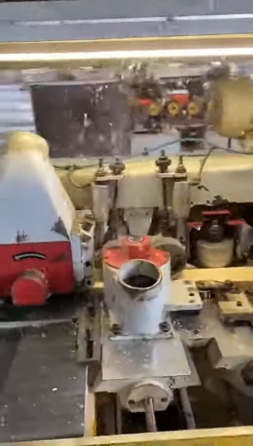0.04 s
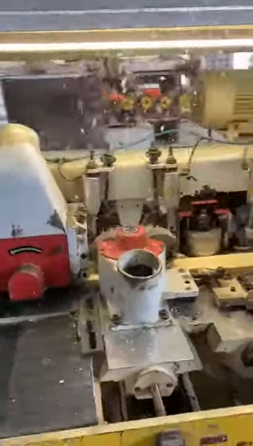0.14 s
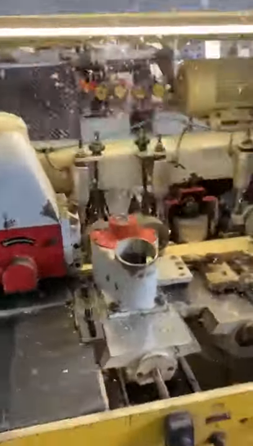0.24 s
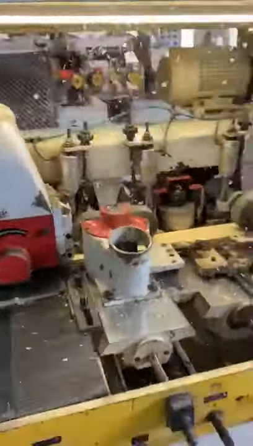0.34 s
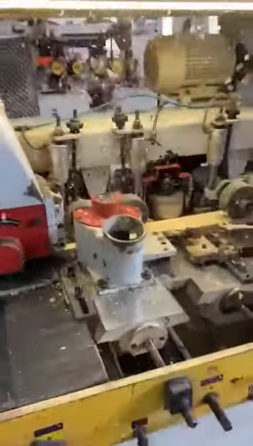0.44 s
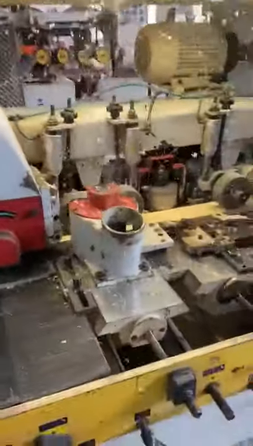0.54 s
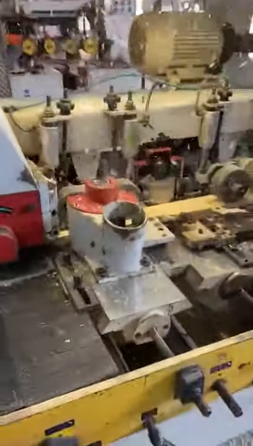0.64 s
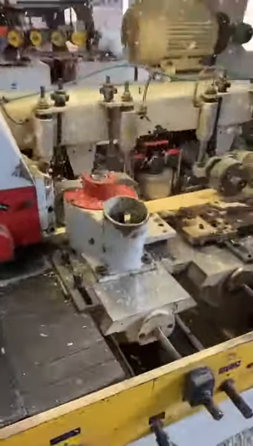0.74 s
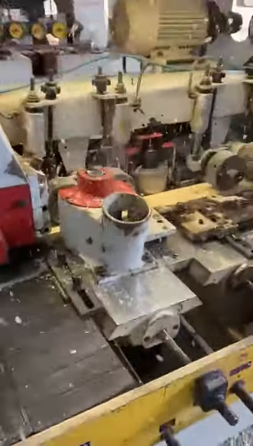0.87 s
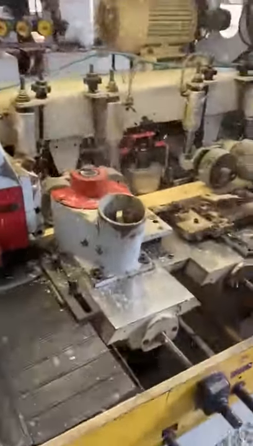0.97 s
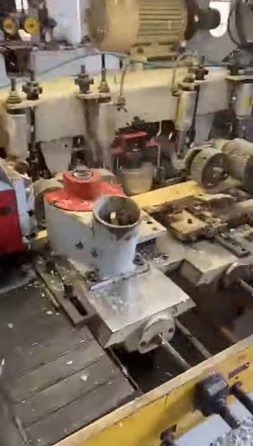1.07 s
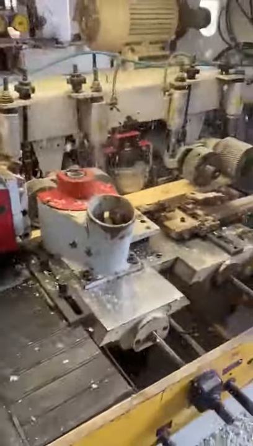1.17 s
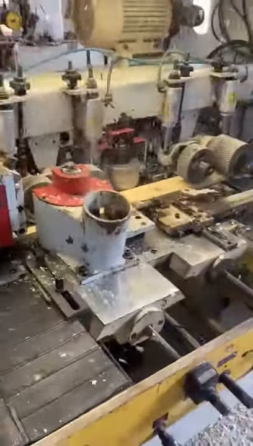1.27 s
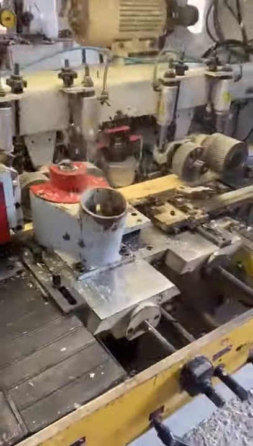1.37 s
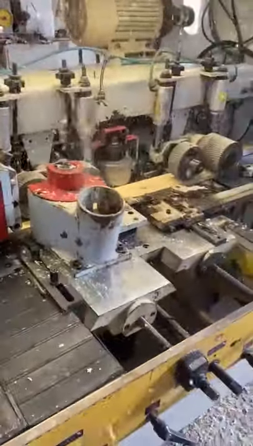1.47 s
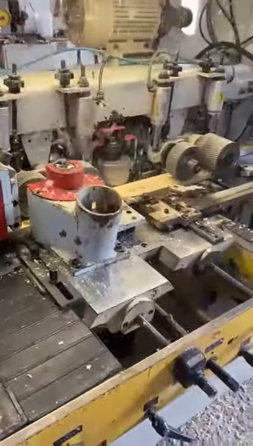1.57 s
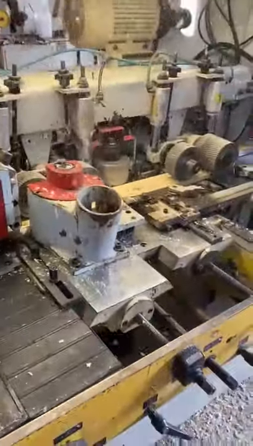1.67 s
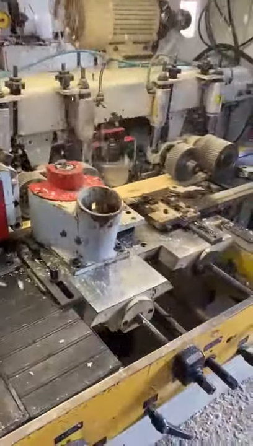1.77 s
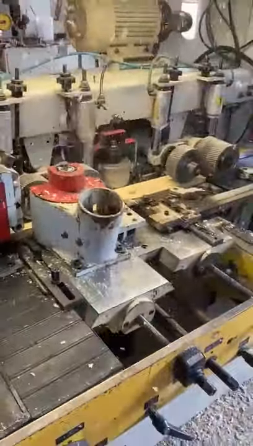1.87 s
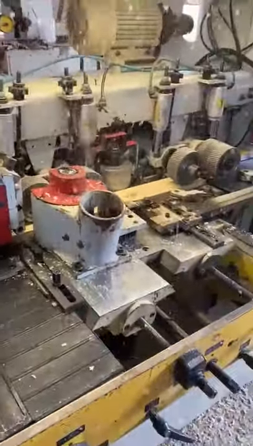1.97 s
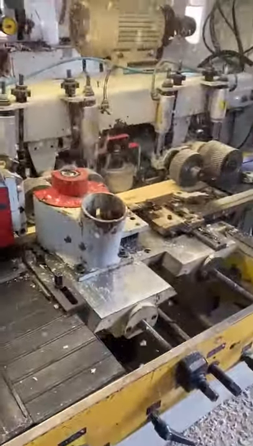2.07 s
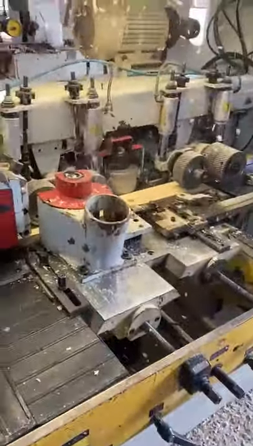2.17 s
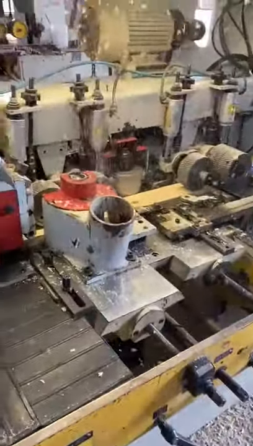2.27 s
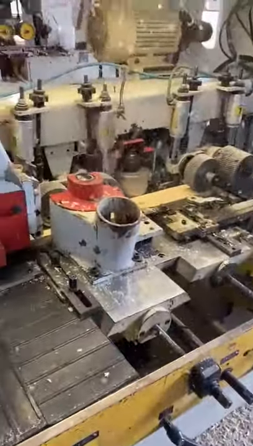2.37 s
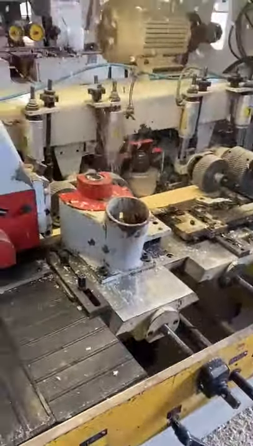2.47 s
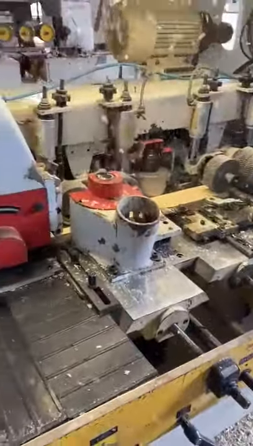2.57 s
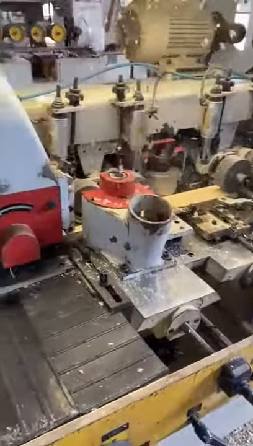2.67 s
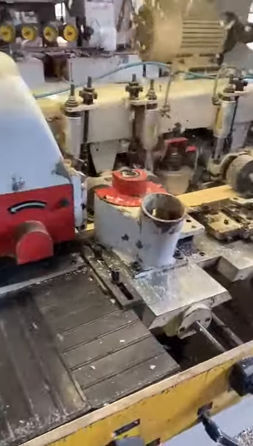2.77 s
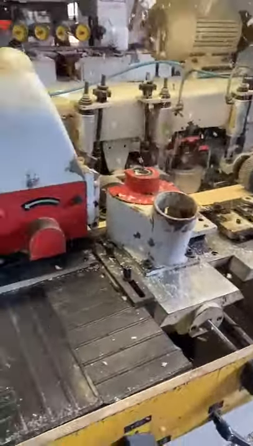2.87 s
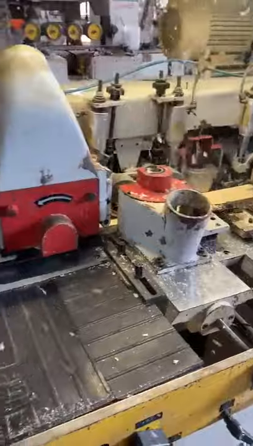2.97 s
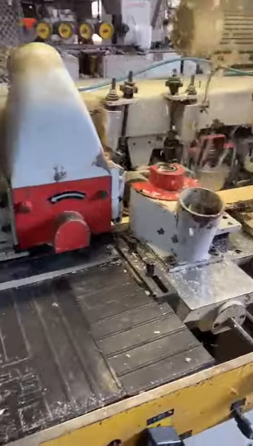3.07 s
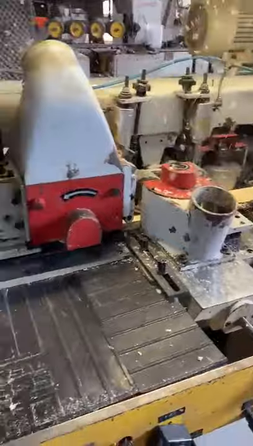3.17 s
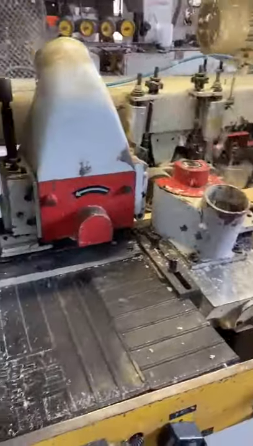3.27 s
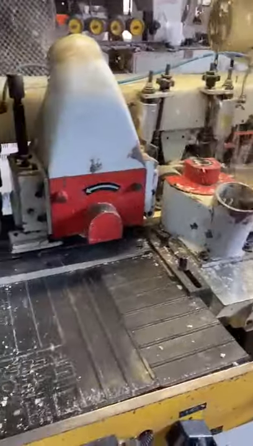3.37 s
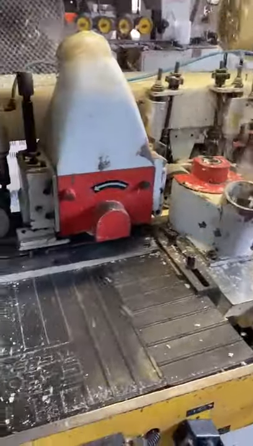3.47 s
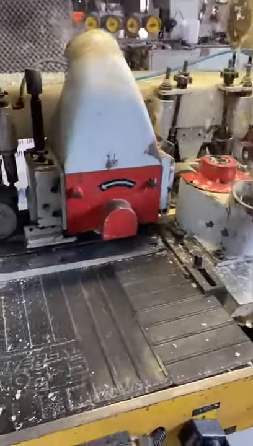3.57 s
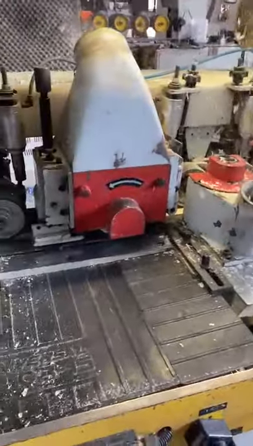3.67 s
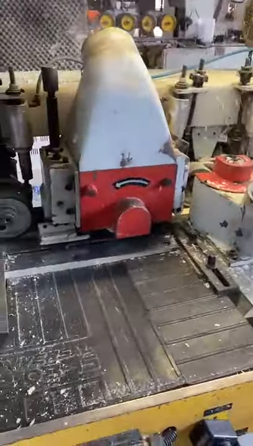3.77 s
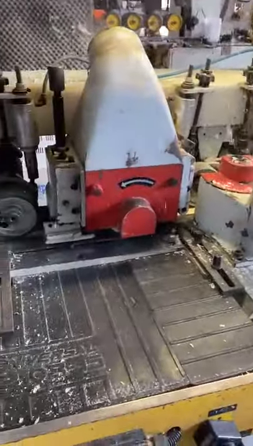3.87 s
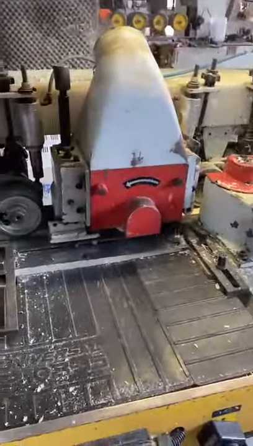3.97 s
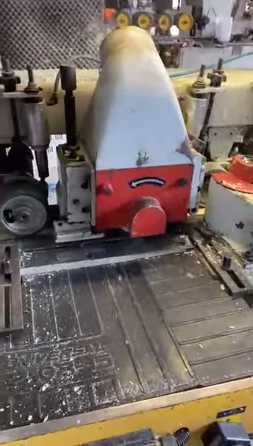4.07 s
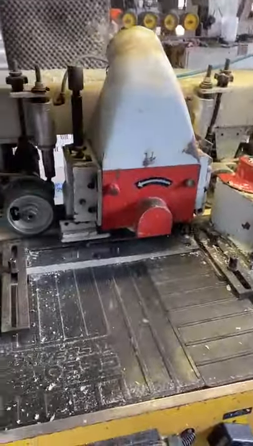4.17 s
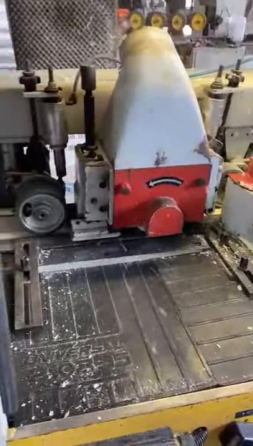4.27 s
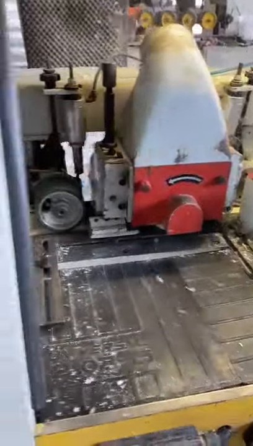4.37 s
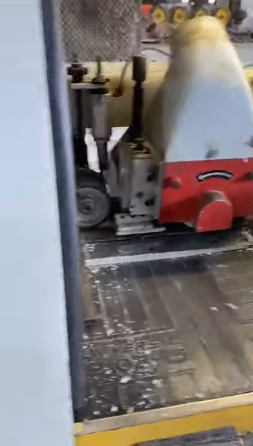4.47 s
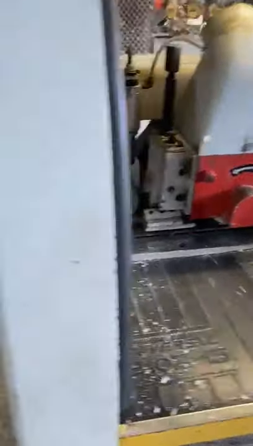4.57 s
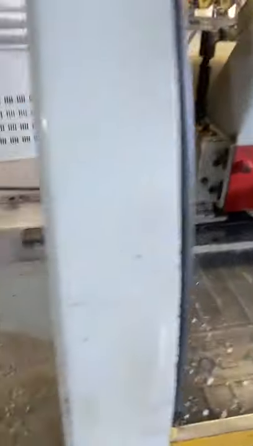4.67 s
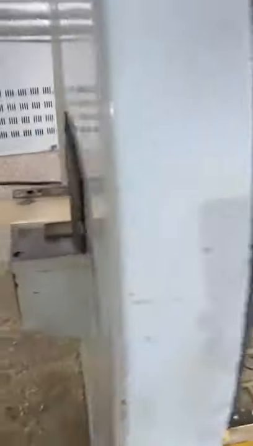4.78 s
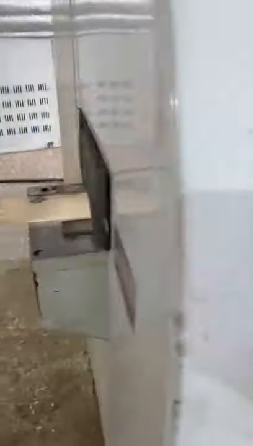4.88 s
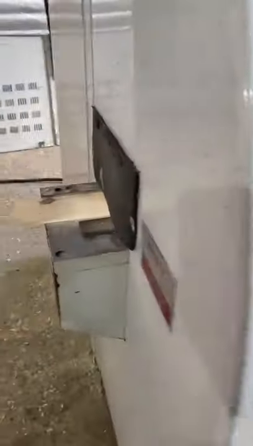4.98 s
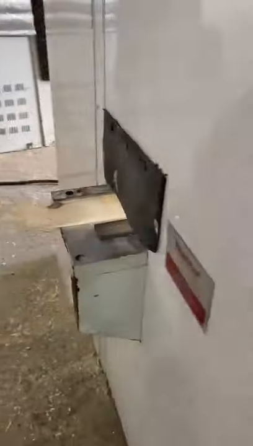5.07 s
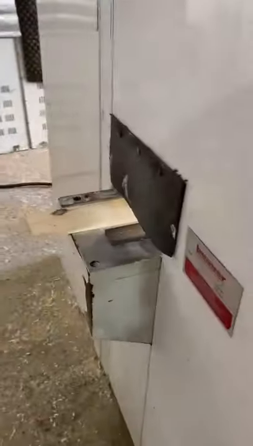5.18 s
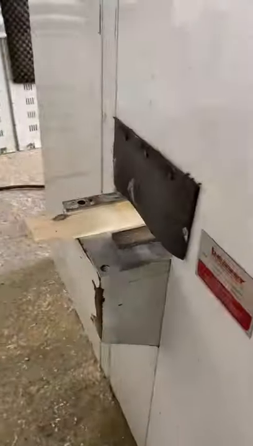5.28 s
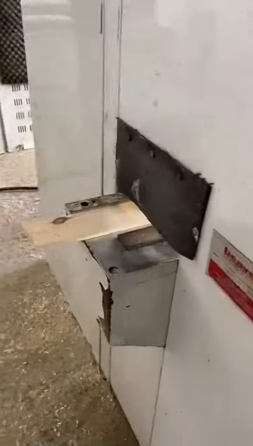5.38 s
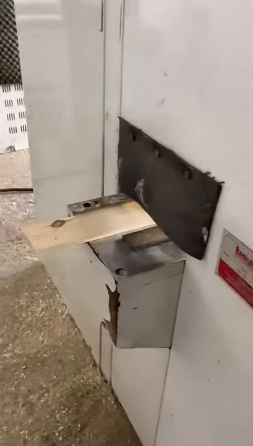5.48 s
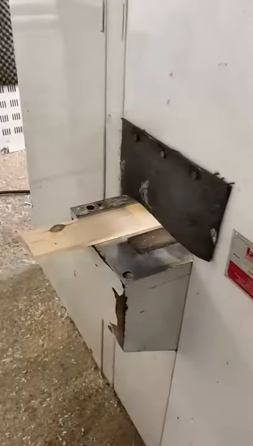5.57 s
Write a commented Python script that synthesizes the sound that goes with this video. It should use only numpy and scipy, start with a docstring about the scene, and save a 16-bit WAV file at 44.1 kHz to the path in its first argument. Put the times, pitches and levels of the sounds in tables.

```python
"""A four-sided planer-moulder cuts a board; the microphone moves along it. Throughout, motors drone, noise rushes,
four spindles hum and beat, and chips hiss and patter. At first a rough pair of heads beats in the wood: overtone
sums, one blow a turn. At 1 s a harder, buzzing head bites; the rough pair leaves from 1.35 s. The infeed guard's
shading deepens from 3.3 s; the hum dips at 4 s. Two chips tick on steel at 4.6 and 4.8 s, as the cut grows
duller, dullest at 5.25 s."""
import sys
import numpy as np
from scipy import signal
from scipy.fft import rfft, irfft, next_fast_len
from scipy.io import wavfile
from scipy.ndimage import uniform_filter1d

SR = 44100
rng = np.random.default_rng(int(sys.argv[2]) if len(sys.argv) > 2 else 0)


def put_to_file(sound):
    """Save the sound as 16-bit audio at rate SR, in the file named by the first command-line argument."""
    columns = np.atleast_2d(sound).T  # one column per channel
    safe = np.clip(columns, -1, 1)
    whole_steps = np.round(safe * 32767)
    wavfile.write(sys.argv[1], SR, whole_steps.astype(np.int16))


N = 248283
TIME = np.arange(N) / SR
BLOCK = 64  # samples per step of the overtone synthesis

# Background
# rush of air and machinery: f/Hz, density/(dB per Hz)
RUSH = [(15, -103.5), (33, -90.5), (55, -64.5), (75, -77.5), (110, -76.5), (160, -68), (260, -71.5),
        (400, -69), (600, -73), (1000, -74.5), (2000, -85.5), (5000, -90), (12000, -103)]
# motors, belts, feed gears: f/Hz, mean level/dB
MOTORS = [(50, -60), (58.3, -71), (88.5, -59), (108.05, -54.5), (116.5, -52), (145.6, -48), (174.5, -59.5),
          (190.3, -59.5), (312.4, -56), (350, -71.5), (372.2, -58.5)]
# difference against sum: f/Hz, level/dB (tones take a share of it)
WIDTH = [(60, -32), (110, -25), (200, -16), (450, -13), (850, -4.5), (1500, -18), (2100, -12), (2800, -3),
         (4000, -5), (5500, 1.5), (8000, 12)]
# lean to the left: f/Hz, share
LEAN = [(80, -0.033), (200, 0.14), (450, 0.27), (900, 0.063), (2000, .07), (4500, -0.15), (8000, 0)]
SUM_EDGE_HZ, DIFFERENCE_EDGE_HZ = 7250, 11950

# Hum
# four nearly equal spindles: speed/(turns per s), t in step with the first/s
SPINDLES = [(104.259, 0), (104.082, 4.43), (104.381, 4.14), (103.766, 1.28)]
# hum per spindle, on top of HUM_LEVEL: twice a turn/dB, four times a turn (knives)/dB
SPINDLE_TONES = [(-51.5, -42.5), (-56.5, -43.5), (-72, -35.5), (-58.5, -49)]
# grows towards the open heads, dips briefly, fades past them: t/s, relative level/dB
HUM_LEVEL = [(0.05, -16), (.22, 1.5), (1, 3), (2.3, -1), (3.85, 2), (4.02, -13), (4.2, -3.5), (4.7, 0.5),
             (5.1, -4.5), (5.63, -2.5)]
# out-of-balance last spindle, before trim: t/s, level/dB
DRONE = [(0.03, -46), (1.32, -38), (2.12, -43.5), (3.71, -41), (4.34, -46), (5.4, -33.5), (5.6, -35)]
# eight times the spindle speed, before trim: t/s, level/dB
EIGHTH = [(0.0, -31), (0.09, -30), (0.2, -30), (0.39, -41), (0.44, -32), (0.8, -42), (0.85, -35.5),
          (1.3, -34.5), (1.57, -45), (1.65, -36.5), (1.98, -35), (2.13, -43.5), (2.84, -36.5), (2.88, -42),
          (5.0, -39.5), (5.44, -56.5), (5.6, -44), (5.63, -46)]

# Chips
# torn fibres and flying chips, before modulation: f/Hz, density/(dB per Hz)
CHIPS = [(100, -101), (350, -68.5), (700, -73), (1150, -72.5), (1650, -67.5), (2400, -71.5), (3500, -73.5),
         (5000, -81), (6300, -80.5), (8000, -95.5), (10000, -96), (12000, -111)]
# large chips on steel, before high-pass: t/s, level/dB
CHIP_HITS = [(4.557, -36.5), (4.845, -37)]
CHIP_FLUTTER_DB = .7
# comb depth of the hiss, peaking at multiples of the turn rate; full above this frequency
HISS_COMB, HISS_COMB_HZ = .85, 2400
THROB = .85  # how far chips gather into puffs, share

# Cutter motion and position
# spindle speeds: t/s, speed/(turns per s)
ROUGH_SPEED = [(0, 104.2), (.35, 104.25), (.7, 104.36), (1.5, 104.3)]
HARD_SPEED = [(1, 104.22), (2, 104.25), (4.4, 104.27), (5, 104.2), (5.63, 104.12)]
# microphone behind the infeed guard: t/s, share 0-1
BEHIND_GUARD = [(0, 0.34), (3.3, 0.03), (3.9, 0.22), (4.35, 0.3), (4.6, 0.55), (4.9, 0.87), (5.25, 1),
                (5.45, 0.37), (5.63, 0.57)]
# direct knife sound fills echo dips between overtones: t/s, share 0-1
DIRECT = [(0, .45), (.85, .45), (1, 0.13), (1.55, 0.62), (2, .1), (2.9, .1), (3.3, .1), (4, .1), (5, 0.23),
          (5.5, 0)]
HARD_ENTERS_S, ENTRY_S = .99, .025
ROUGH_LEAVES_S, EXIT_DB_PER_S = 1.35, 95
ROUGH_AGAINST_HARD_DB = -9
ROUGH_LATE_TURNS = .2

# Cutter radiation, relative; levelled per register
# head and hood: multiple of spindle speed, level/dB
ROUGH_ORDERS = [(5, -15), (6, -11), (7, -8), (9, -9), (10, -12), (11, 2.5), (12, 8), (13, 7.5), (14, -7),
                (15, -2.5), (16, -3.5), (17, -3.5), (18, -9), (19, -1), (20, -4.5), (21, -11.5), (22, -2),
                (23, -2.5), (24, -7.5)]
HARD_ORDERS = [(5, -18.5), (6, -14), (7, -10.5), (9, -16), (10, -10), (11, -9), (12, 1.5), (13, 3),
               (14, -12), (15, -2.5), (16, 3), (17, -5.5), (18, -15), (19, -10), (20, -0.5), (21, -4.5),
               (22, -7.5), (23, -8.5), (24, -13), (25, -8), (26, -15), (27, -10), (28, -10.5), (29, -17.5),
               (30, -20.5), (31, -10), (32, -15.5)]
# hard head behind the guard: multiple of spindle speed, level/dB
GUARD_ORDERS = [(5, -19), (6, -19.5), (7, -6.5), (9, -23.5), (10, -15.5), (11, -15.5), (12, -16), (13, -4),
                (14, -5.5), (15, -4), (16, 0.5), (17, -12.5), (18, -16.5), (19, -9), (20, -17.5),
                (21, -20.5), (22, -10.5), (23, -13), (24, -22), (25, -12), (26, -19), (27, -26),
                (28, -14.5), (30, -24), (31, -30.5), (32, -10.5)]
# higher up: f/Hz, level/dB
ROUGH_TREBLE = [(2700, -12), (3200, -9.5), (3650, -10), (4200, -15), (5000, -14.5), (6500, -16),
                (8000, -38), (9000, -25.5), (10500, -41.5), (12000, -34.5)]
HARD_TREBLE = [(3450, -20), (3650, -11.5), (4000, -21), (4600, -18.5), (5100, -16.5), (5700, -10.5),
               (6200, -16), (6600, -27), (8000, -53.5), (10000, -42), (12000, -49.5)]
GUARD_TREBLE = [(3450, -9.5), (3560, -19), (3750, -28.5), (4300, -20.5), (5100, -29.5), (5900, -27.5),
                (8000, -63.5), (12000, -61)]

# Cutter levels, before per-head trim
# rasp, body, growl, bite, sizzle: f low/Hz, f high/Hz
REGISTERS = [(1400, 2400), (1100, 1400), (570, 1100), (2400, 4500), (4500, 7000)]
# rasp, leading the cut's loudness: t/s, level/dB
LOUDNESS = [(0.03, -21), (.2, -22.5), (0.42, -21), (.62, -22.5), (.85, -21.5), (0.97, -25), (1.02, -19),
            (1.12, -21.5), (1.35, -19.5), (1.55, -19.7), (1.85, -24.5), (2.2, -24), (2.95, -23.5),
            (3.14, -21), (3.36, -24), (3.5, -22), (3.65, -27), (3.82, -28), (4.02, -23.5), (4.59, -24),
            (4.98, -28.5), (5.17, -32.5), (5.33, -32), (5.6, -34.5)]
USUAL_DB = -22.7  # loudness at which followers keep their usual level
# body: t/s, level/dB
BODY = [(0.0, -35), (0.14, -36), (0.27, -27), (0.63, -28), (1.1, -38.5), (1.25, -27), (1.4, -28),
        (1.63, -27), (1.91, -32), (2.13, -29), (2.9, -31), (3.12, -27.5), (3.42, -29.5), (3.7, -39.5),
        (4.22, -31), (4.55, -41.5), (4.61, -37), (4.7, -44.5), (5.05, -42.5), (5.63, -35.5)]
# bite: t/s, level/dB
BITE = [(0, -26.5), (.4, -26), (.8, -29), (.95, -30), (1.03, -25.5), (1.35, -25.5), (1.55, -28.5),
        (1.85, -30.5), (2.3, -26), (2.9, -27.5), (3.15, -28.5), (3.35, -30.5), (3.52, -27.5), (3.75, -32.5),
        (4.05, -28.5), (4.4, -30.5), (4.6, -36), (4.77, -33), (4.87, -38.5), (4.98, -36), (5.3, -39.5),
        (5.55, -37)]
# growl, sizzle: slope/(dB per dB of loudness), shade behind guard/dB, flicker/dB
REGISTER_RULE = [(0.83, -4, 1.13), (0.52, -13, 1.5)]
FLICKER_PER_S = 4
# lean of the rasp to its top: t/s, tilt/(dB per octave)
RASP_TILT = [(0, -3), (.4, 2), (.9, -4.5), (1.04, 5), (1.25, -3), (1.7, -0.5), (2.2, -7), (2.9, -8.5),
             (3.15, -1), (3.55, 5), (4, 2), (4.5, 0.5), (5, -10), (5.25, 0), (5.45, -1), (5.6, 14)]

# Moving resonances
# hoods, two whines: t/s, centre f/Hz, lift/dB
LOW_WHINE = [(.1, 1334, 14), (.3, 1290, 17), (.55, 1310, 1), (.8, 1180, 1.5), (1.2, 1224, 12),
             (1.8, 1140, -5.5), (2.3, 1330, -1), (3.2, 1286, 8), (3.7, 1280, 21), (4.2, 1340, 10),
             (4.6, 1340, -9.5), (5.5, 1130, 19)]
HIGH_WHINE = [(.05, 2100, 7.5), (.25, 2030, 5), (.42, 1940, 8.5), (.7, 1700, 2.5), (1.05, 1540, 1),
              (1.5, 1720, -1), (2.2, 1570, -5.5), (3, 1670, 1), (3.5, 1650, 2), (4.1, 1660, 4.5),
              (4.6, 1700, 2), (5, 1540, -3.5), (5.35, 1390, 11)]
# side hood, shrill: t/s, centre f/Hz, lift/dB
SHRILL = [(.05, 3540, -6), (.3, 3750, 4), (.8, 3600, -6), (1.35, 3400, 4.5), (2.4, 3810, 0), (3.3, 3650, 0),
          (3.52, 3700, 4.5), (4.1, 3840, -4.5), (4.45, 3550, -11.5), (4.58, 3450, 8), (4.77, 3500, 6),
          (5.1, 3490, -2)]
# machine bed, hollow: t/s, centre f/Hz, lift/dB
HOLLOW = [(.1, 1010, -0.5), (.55, 1054, 9), (.85, 1080, 4.5), (.95, 970, 4.5), (1.3, 945, 8.5),
          (1.6, 960, -10.5), (2.2, 1030, 1.5), (2.7, 1050, -2.5), (3.15, 1050, 8.5), (3.5, 1030, 9),
          (3.9, 1050, -2), (4.4, 1050, -3), (5.1, 1000, 7.5), (5.55, 1050, 4.5)]
WHINE_WIDTH_HZ, SHRILL_WIDTH_HZ = 70, 550

# Stroke and echoes
ROUGH_SWEEP_S, HARD_SWEEP_S = .00045, .00012  # spread of the registers within a stroke
ROUGH_SHAKE_RAD, HARD_SHAKE_RAD = .085, .075  # phase jitter from wood grain, at the rasp's pitch
ROUGH_SCATTER_RAD, HARD_SCATTER_RAD = .12, .21  # echo phase spread up to the rasp's pitch, in the open
ROUGH_DRIFT_PER_S, HARD_DRIFT_PER_S = 1.6, .8  # echo drift rate at the rasp's pitch
FASTEST_FADE = 1.3  # drift rate stops rising above this multiple of the rasp's pitch
GUARD_SCATTER = 1.6  # extra scatter behind the guard, where only reflections arrive
RING = .78  # share of the minimum-phase ring
BOUNCE_S, BOUNCE, BOUNCE_HZ = .0031, .45, 3300  # steel frame echo: delay, gain, lowest frequency
TWIN_SLIP_TURNS_PER_S, TWIN_IN_STEP_S, TWIN = -.3, -1.2, .48  # second rough head: slip, t in step, strength


def amp(db):
    """Decibels to gain."""
    return 10 ** (np.asarray(db) / 20)


def curve(rows, t=TIME, axis=1):
    """One column of a time table, linearly interpolated."""
    rows = np.array(rows)
    return np.interp(t, rows[:, 0], rows[:, axis])


def read(points, hz):
    """A spectrum table, interpolated over log frequency."""
    f, value = np.transpose(points)
    return np.interp(np.log(hz + 1), np.log(f + 1), value)


def wander(t, per_s):
    """Unit-spread smooth chance: twelve random sines with rates around per_s."""
    speed, start = rng.standard_normal((12, 1)), rng.random((12, 1))
    angle = 2 * np.pi * (per_s * speed * t + start)
    return np.sin(angle.astype(np.float32)).sum(0) / np.sqrt(len(speed) / 2)


def slow(per_s):
    """Smooth chance at every sample, interpolated from a coarse grid."""
    t = np.linspace(0, TIME[-1], N // 128)
    return np.interp(TIME, t, wander(t, per_s))


def turns_of(speed):
    """Turns made by a spindle: integral of its speed."""
    return np.cumsum(curve(speed)) / SR


def in_wood(t=TIME):
    """Engagement of the rough and the hard head, as gains."""
    rough = amp(-np.clip(EXIT_DB_PER_S * (t - ROUGH_LEAVES_S), 0, 40))
    hard = np.clip((t - HARD_ENTERS_S) / ENTRY_S, .005, 1)
    return rough, hard


def colour(pair, spectrum, comb_depth=0):
    """Filter two white noises to a wide sum and difference; a one-turn delay combs them at the turn rate."""
    size = next_fast_len(N)
    hz = np.fft.rfftfreq(size, 1 / SR)
    depth = comb_depth * np.minimum(hz / HISS_COMB_HZ, 1)
    one_turn_late = np.exp(-2j * np.pi * hz / curve(HARD_SPEED).mean())
    comb = (1 + depth * one_turn_late) / np.hypot(1, depth)
    a, b = rfft(pair, size) * amp(read(spectrum, hz)) * comb * np.sqrt(SR / 2)
    side = read(LEAN, hz) * a + amp(read(WIDTH, hz)) * b
    return irfft([a, side], size)[:, :N]


def tone(hz, level_db, waver_rad, spread, lead_turns=0):
    """Phase-wavering machine tone, as sum and difference; level is RMS."""
    phase = 2 * np.pi * (hz * TIME + lead_turns) + waver_rad * slow(1.2)
    z = np.sqrt(2) * amp(level_db) * np.exp(1j * phase)
    side = read(LEAN, hz) * z.real - spread * amp(read(WIDTH, hz)) * z.imag
    return np.array([z.real, side])


def rush():
    """Steady broadband noise of air and machinery."""
    return colour(rng.standard_normal((2, N)), RUSH)


def motors():
    """Motors, belts and gears: fixed-pitch tones, each wandering in level and phase."""
    return sum(tone(hz, db + 2.0 * slow(1.8), waver_rad=1.0, spread=.7) for hz, db in MOTORS)


def spindle_hum():
    """Tones locked to four nearly equal speeds swell and cancel as the spindles drift in and out of step."""
    first_speed = SPINDLES[0][0]
    out = tone(SPINDLES[-1][0], curve(DRONE) - 0.5, waver_rad=.15, spread=.5)
    for (speed, in_step_s), levels_db in zip(SPINDLES, SPINDLE_TONES):
        lead = (first_speed - speed) * in_step_s
        for order, db in zip((2, 4), levels_db):
            out += tone(order * speed, db + curve(HUM_LEVEL), waver_rad=.029, spread=.8,
                        lead_turns=order * lead)
    return out + tone(8 * first_speed, curve(EIGHTH) - 2.0, waver_rad=.2, spread=.8)


def chips(follow=0.55, guard_db=-7.0, patter_per_s=300, patter_db=-10, tearing_db=2.0):
    """Noise pulsing once a turn (puffs) plus random decaying strikes on the hoods; level follows the cut."""
    rough, hard = in_wood()
    puff_turns = turns_of(HARD_SPEED) - .1 - ROUGH_LATE_TURNS * (1 - hard)
    puffs = 1 + THROB * np.cos(2 * np.pi * puff_turns)
    strikes = (rng.random(N) < patter_per_s / SR) * rng.exponential(1, N)
    decay = np.exp(-TIME[:400] / .0008)
    patter = signal.oaconvolve(strikes, decay)[:N]
    size = puffs + amp(patter_db) * patter / patter.std()
    level_db = follow * (curve(LOUDNESS) - USUAL_DB) + guard_db * curve(BEHIND_GUARD)
    level_db = level_db + tearing_db * rough + CHIP_FLUTTER_DB * slow(7.3)
    return colour(size * rng.standard_normal((2, N)), CHIPS, HISS_COMB) * amp(level_db)


def chip_hits(decay_s=0.019, low_hz=3500):
    """Single chips on steel: decaying bursts of high-passed noise."""
    size = sum(amp(db) * (TIME >= s) * np.exp(-abs(TIME - s) / decay_s) for s, db in CHIP_HITS)
    high_pass = signal.butter(2, low_hz, "high", fs=SR, output="sos")
    return signal.sosfilt(high_pass, size * rng.standard_normal((2, N)))


def overtones(orders, treble, count=114):
    """Relative level in dB of every multiple of the spindle speed."""
    base_hz = HARD_SPEED[0][1]
    points = [(k * base_hz, db) for k, db in orders] + treble
    return read(points, base_hz * np.arange(1, count + 1))


def head_shares(t):
    """Gains of the rough and the hard head; squares sum to one."""
    rough, hard = in_wood(t)
    rough = rough * amp(ROUGH_AGAINST_HARD_DB)
    return np.array([rough, hard]) / np.hypot(rough, hard)


def register_levels(t):
    """Rasp, body, growl, bite, sizzle in dB; growl and sizzle follow loudness, flicker, and the guard shades them."""
    rasp_db = curve(LOUDNESS, t)
    behind = np.clip(curve(BEHIND_GUARD, t), 0, 1)
    growl_db, sizzle_db = (
        USUAL_DB + follow * (rasp_db - USUAL_DB) + shade_db * behind + flicker_db * wander(t, FLICKER_PER_S)
        for follow, shade_db, flicker_db in REGISTER_RULE)
    return [rasp_db, curve(BODY, t), growl_db, curve(BITE, t), sizzle_db]


def resonance_db(rows, width_hz, t, hz):
    """Gaussian lift of each overtone by one moving resonance."""
    offset = (hz - curve(rows, t)[:, None]) / width_hz
    return curve(rows, t, axis=2)[:, None] * np.exp(-.5 * offset ** 2)


def whine_db(t, hz):
    """Moving hood resonances plus the tilt of the rasp."""
    lo, hi = REGISTERS[0]
    octaves = np.log2(hz / np.sqrt(lo * hi)) * ((hz > lo) & (hz < hi))
    lift_db = curve(RASP_TILT, t)[:, None] * octaves
    for rows, width_hz in ((LOW_WHINE, WHINE_WIDTH_HZ), (HIGH_WHINE, WHINE_WIDTH_HZ), (SHRILL, SHRILL_WIDTH_HZ)):
        lift_db = lift_db + resonance_db(rows, width_hz, t, hz)
    return lift_db


def levelled(shape_db, t, hz, trim_db):
    """Echoes only trade strength between overtones: scale each register's power to the level of the cut."""
    lifts_db = []
    for db, trim, (lo, hi) in zip(register_levels(t), trim_db, REGISTERS):
        power = np.sum(amp(shape_db[:, (hz > lo) & (hz < hi)]) ** 2, 1)
        lifts_db.append(db + trim - 10 * np.log10(power))
    rising = np.argsort(np.array(REGISTERS)[:, 0])
    # short crossfades at the register edges
    edges = (np.array(REGISTERS)[rising] * [1.04, .96]).ravel()
    weights = np.array([np.interp(hz, edges, np.repeat(row, 2)) for row in np.eye(len(rising))])
    return shape_db + np.array(lifts_db)[rising].T @ weights


def ring_phase(level_db, order):
    """A blow rings after it lands: minimum phase (Hilbert transform of log gain), scaled by RING."""
    mirrored_db = np.c_[level_db[:, :1], level_db, level_db[:, -2::-1]]
    return -RING * signal.hilbert(np.log(amp(mirrored_db))).imag[:, order]


def twin_beats(t, order, strength):
    """A slipping second head beats against the first, faster in each higher overtone."""
    slip_turns = TWIN_SLIP_TURNS_PER_S * (t[:, None] - TWIN_IN_STEP_S)
    return (1 + strength * np.exp(2j * np.pi * slip_turns * order)) / np.hypot(1, strength)


def frame_bounce(hz, gain):
    """The treble of the stroke returns late from the steel frame."""
    back = gain * (hz > BOUNCE_HZ)
    return (1 + back * np.exp(-2j * np.pi * hz * BOUNCE_S)) / np.hypot(1, back)


def cutter(speed, share, open_db, guarded_db, scatter_rad, drift_per_s, fade_db, shake_rad, trim_db, sweep_s,
           late_turns=0, twin=0, rebound=0):
    """The proudest knife strikes once a turn: a sum of overtones, shifted by echoes as the microphone moves."""
    t, order = TIME[::BLOCK], np.arange(1, len(open_db) + 1)
    hz = curve(speed).mean() * order
    height = hz / np.sqrt(np.prod(REGISTERS[0]))  # multiple of the rasp's pitch

    # short waves scatter sooner; the strong middle register stays one sharp stroke
    blur, pace = np.clip(height, 1, 2), np.minimum(height, FASTEST_FADE)
    fade = np.array([wander(t, r) for r in drift_per_s * pace]).T
    bend = np.array([wander(t, r) for r in drift_per_s * pace / 2]).T
    swing = np.array([wander(t, r) for r in drift_per_s * np.sqrt(pace)]).T

    behind = np.clip(curve(BEHIND_GUARD, t), 0, 1)[:, None]
    direct = np.clip(curve(DIRECT, t), 0, 1)[:, None]
    shape_db = (1 - behind) * open_db + behind * guarded_db
    smooth_db = 20 * np.log10(uniform_filter1d(amp(shape_db), size=3, axis=1))
    shape_db = (1 - direct) * shape_db + direct * smooth_db
    shape_db = shape_db + whine_db(t, hz) + fade_db * np.sqrt(blur) * fade
    level_db = levelled(shape_db, t, hz, trim_db) + resonance_db(HOLLOW, WHINE_WIDTH_HZ, t, hz)

    # the knife sweeps through the wood: registers sound at slightly different moments
    sweep = 2 * np.pi * hz[0] * np.cumsum(sweep_s * wander(order / len(order), 9))
    # uneven grain frays the high overtones most
    grain = shake_rad * height ** 1.5 * np.array([wander(t, 24) for _ in order]).T
    echoes = scatter_rad * blur ** 2 * (1 + GUARD_SCATTER * behind) * bend
    rotation = 2 * np.pi * (turns_of(speed)[::BLOCK, None] - late_turns) * order
    phase = rotation + ring_phase(level_db, order) - sweep + echoes + grain

    beats = twin_beats(t, order, twin * np.minimum(height, 1) ** 3)  # the twin sounds thinner
    mid = share[:, None] * amp(level_db) * beats * frame_bounce(hz, rebound) * np.exp(1j * phase)
    mid = mid * ((order > 4) & (order != 8))  # these multiples belong to the hum
    side = mid * (read(LEAN, hz) + 1j * amp(read(WIDTH, hz)) * np.exp(.9j * swing))
    waves = np.exp(2j * np.pi * hz[:, None] * TIME[:BLOCK])
    return np.sqrt(2) * (np.array([mid, side]) @ waves).real.reshape(2, -1)[:, :N]


def cut():
    """Rough beating pair, then hard buzzing head; trims in dB for rasp, body, growl, bite, sizzle."""
    rough_db = overtones(ROUGH_ORDERS, ROUGH_TREBLE)
    hard_db = overtones(HARD_ORDERS, HARD_TREBLE)
    guarded_db = overtones(GUARD_ORDERS, GUARD_TREBLE)
    rough_share, hard_share = head_shares(TIME[::BLOCK])
    rough = cutter(ROUGH_SPEED, rough_share, rough_db, rough_db, scatter_rad=ROUGH_SCATTER_RAD,
                   drift_per_s=ROUGH_DRIFT_PER_S, fade_db=3.45, shake_rad=ROUGH_SHAKE_RAD,
                   trim_db=[-3.5, 3.5, -13.5, -2.5, -13.0], sweep_s=ROUGH_SWEEP_S,
                   late_turns=ROUGH_LATE_TURNS, twin=TWIN)
    hard = cutter(HARD_SPEED, hard_share, hard_db, guarded_db, scatter_rad=HARD_SCATTER_RAD,
                  drift_per_s=HARD_DRIFT_PER_S, fade_db=2.5, shake_rad=HARD_SHAKE_RAD,
                  trim_db=[-2.0, 1, -15.5, -3.5, -15.5], sweep_s=HARD_SWEEP_S, rebound=BOUNCE)
    return rough + hard


def scene():
    """All sources, from sum and difference to left and right."""
    mid, side = rush() + motors() + spindle_hum() + chips() + chip_hits() + cut()
    return np.array([mid + side, mid - side])


def low_pass(x, edge_hz):
    """Linear-phase low-pass."""
    taps = signal.firwin(255, edge_hz, window=("kaiser", 9), fs=SR)
    return signal.oaconvolve(x, taps, "same")


def record(dry):
    """Band limit, lower for the sum of the channels than for their difference."""
    left, right = dry
    mid = low_pass((left + right) / 2, SUM_EDGE_HZ)
    side = low_pass((left - right) / 2, DIFFERENCE_EDGE_HZ)
    return np.array([mid + side, mid - side])


dry = scene()
out = record(dry)
put_to_file(out)
```